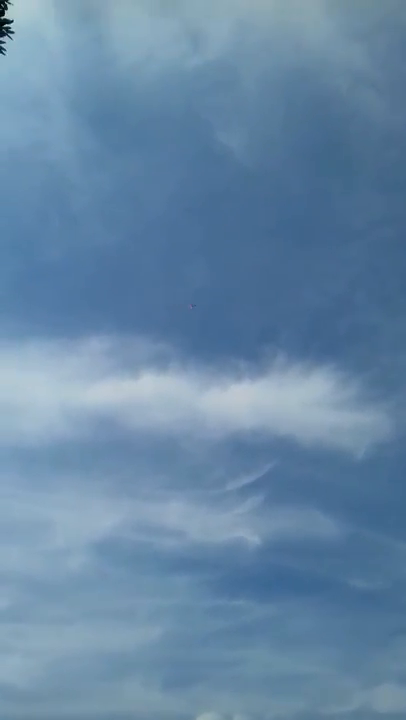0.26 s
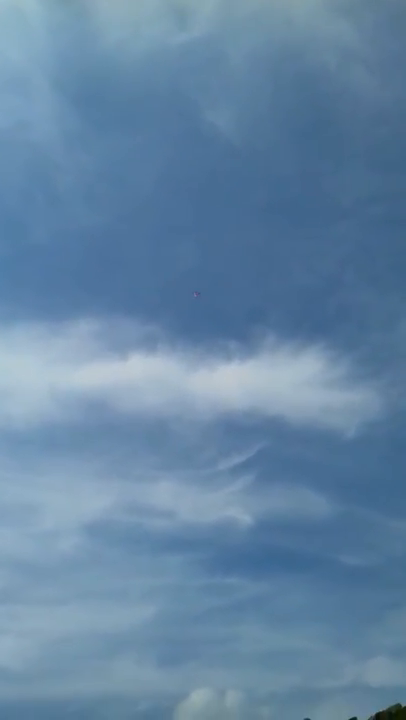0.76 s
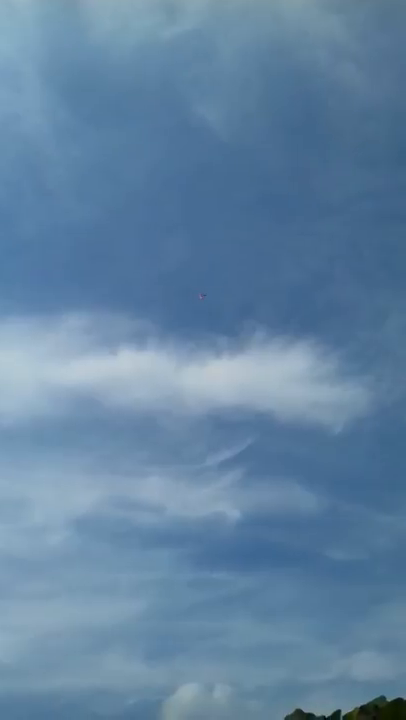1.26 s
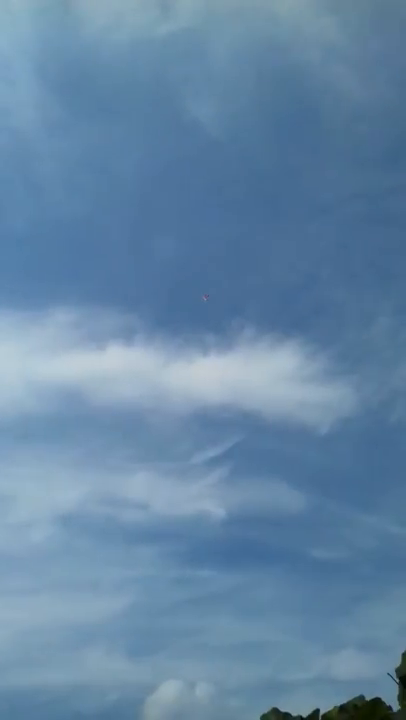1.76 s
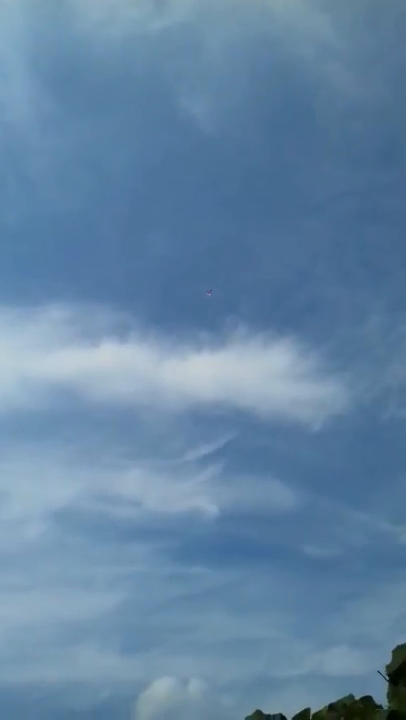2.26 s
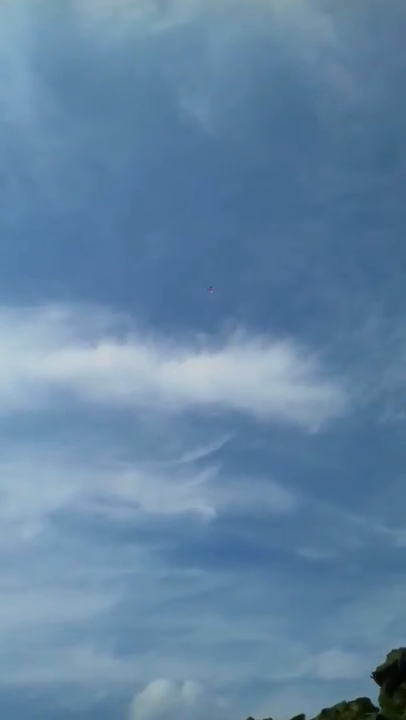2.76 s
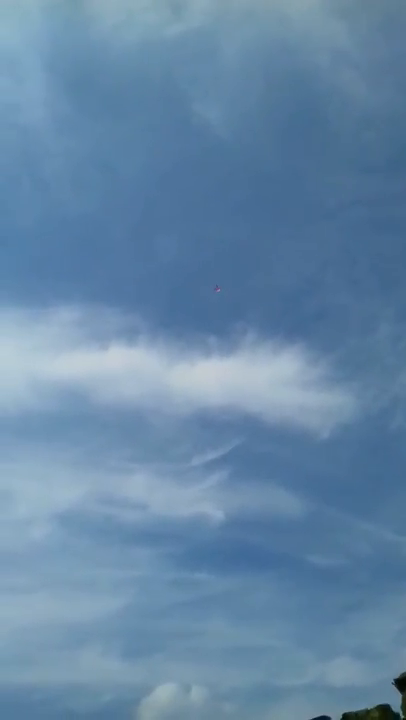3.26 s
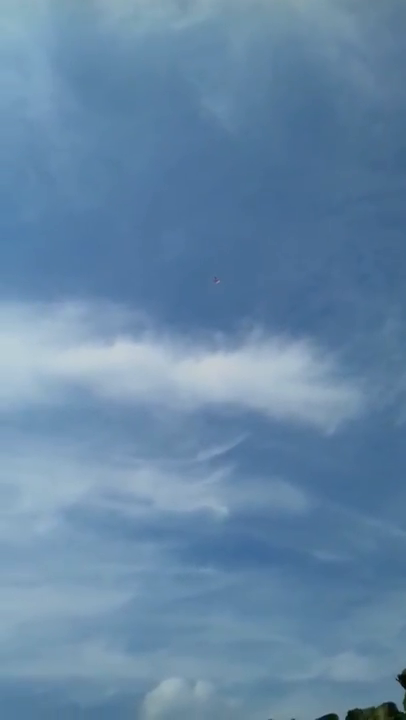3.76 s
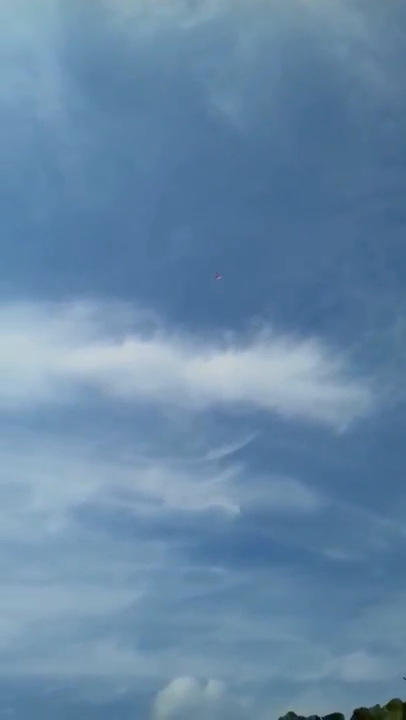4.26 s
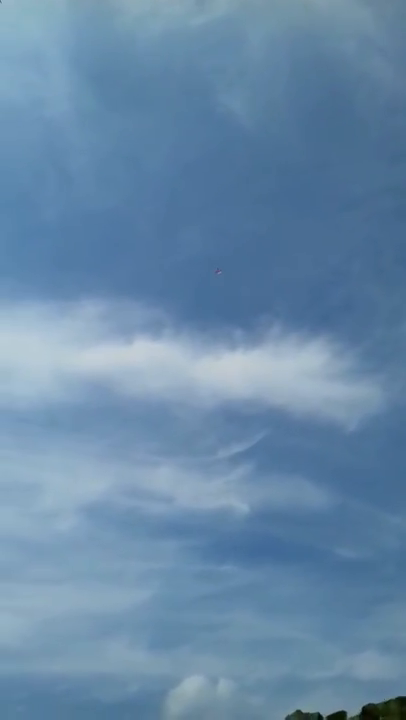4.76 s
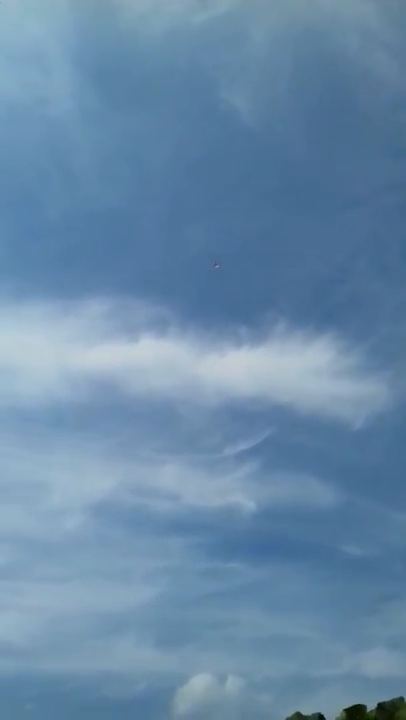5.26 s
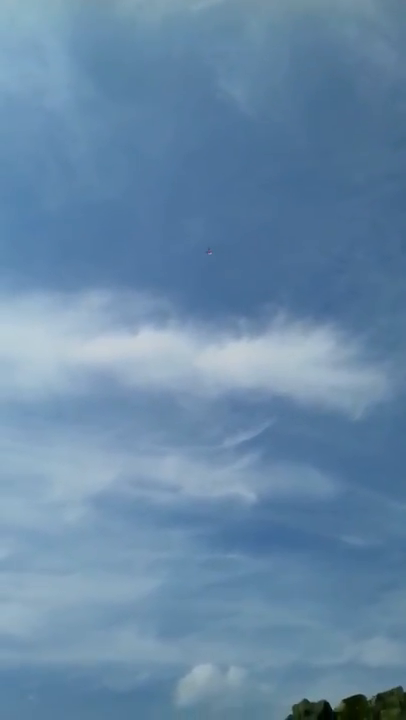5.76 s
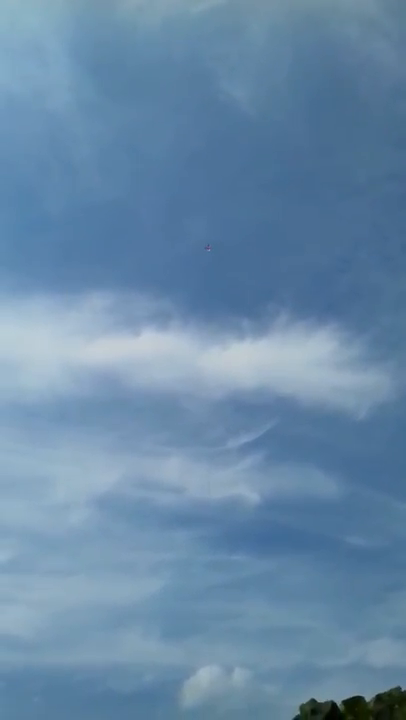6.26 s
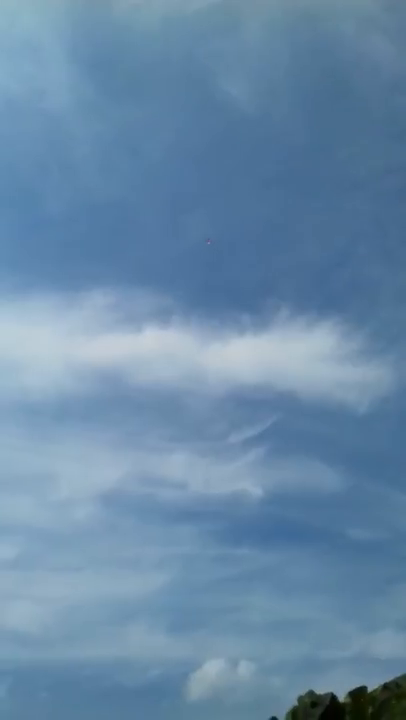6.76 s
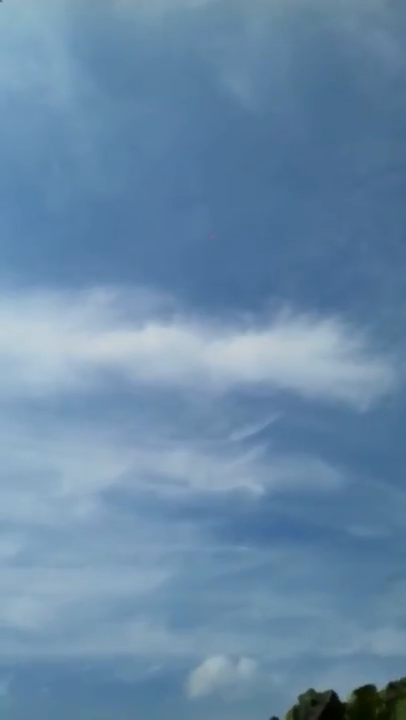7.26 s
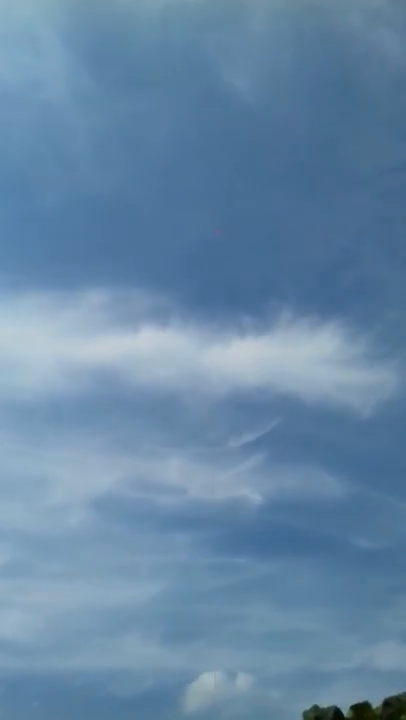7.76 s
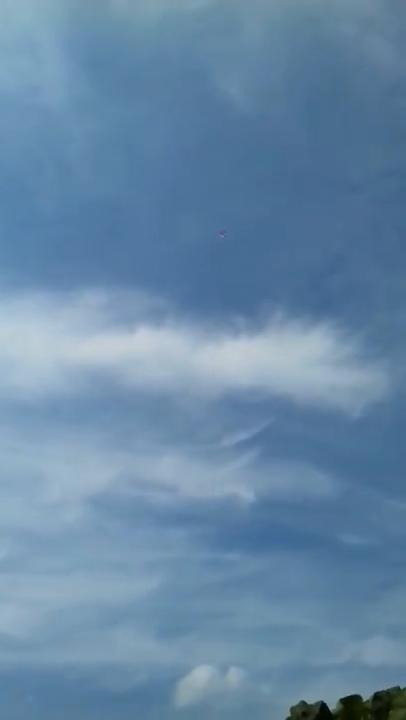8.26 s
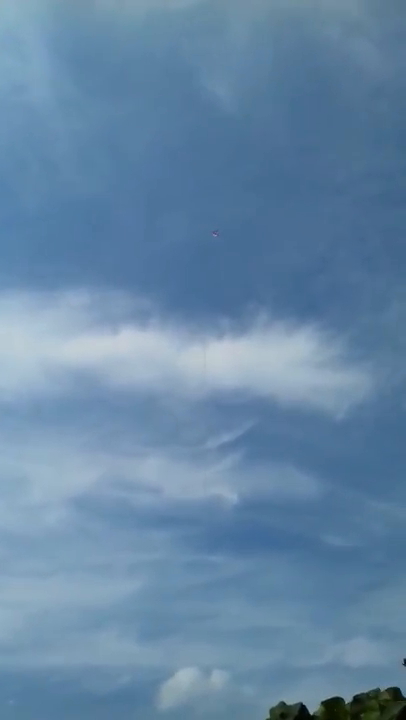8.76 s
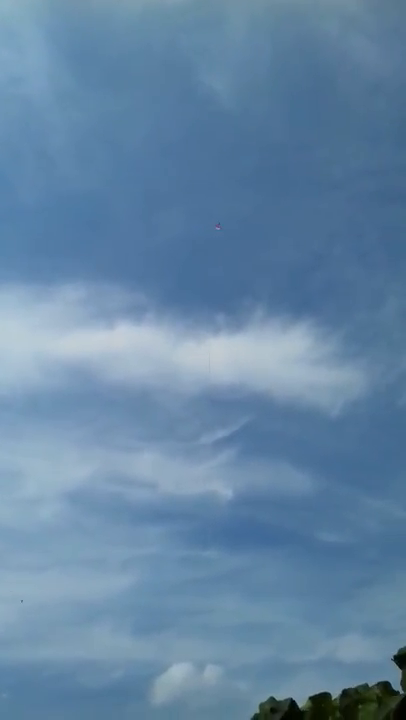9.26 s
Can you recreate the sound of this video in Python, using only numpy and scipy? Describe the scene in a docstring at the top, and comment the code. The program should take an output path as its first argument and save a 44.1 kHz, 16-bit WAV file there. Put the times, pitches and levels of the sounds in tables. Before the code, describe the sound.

A small kite high in the open sky hums with a reedy, nasal buzz, throbbing about nine times a second and jumping slightly in pitch. Midway it settles into a steadier trembling note, then flutters again. Close leaves rustle softly with dry snaps and twig ticks; small birds give brief clear chirps. A quiet outdoor wash, low rumble and microphone hiss lie beneath.

```python
"""Kite with a humming ribbon

A kite flies high over open ground; the wind spins the ribbon on its bow into a buzzing hum, built from
harmonics of the flap rate, that throbs and jumps in pitch. Close by, shaped noise makes leaves rustle and snap
and twigs tick; small birds in the trees chirp with gliding sines. Puffs of wind are short swings of pressure.
Far off lie a noise wash, a rumble, a low hum and a faint whine that climbs; foliage and amplifiers hiss."""
import sys
import numpy as np
from scipy import signal
from scipy.fft import rfft, irfft, next_fast_len
from scipy.io import wavfile
from scipy.ndimage import uniform_filter1d

SR = 44100
rng = np.random.default_rng(int(sys.argv[2]) if len(sys.argv) > 2 else 0)


def dump_mix(stems):
    """Bounce the given channels to the path in sys.argv[1] as a 16-bit WAV at rate SR."""
    frames = np.atleast_2d(stems).T  # one column per channel
    limited = np.clip(frames, -1, 1)  # hard clip at full scale
    pcm = np.round(limited * 32767).astype(np.int16)
    wavfile.write(sys.argv[1], SR, pcm)


def nominal_scale(level):
    """Amplitude ratio for a level in decibels (scalar or array-like)."""
    x = np.asarray(level, float) / 20
    return 10 ** x


N = 419082  # length in samples


def rms_one(x):
    """Scale a sound to an rms of 1."""
    return x / np.sqrt(np.mean(x ** 2) + 1e-20)


def in_time(rows):
    """Draw straight lines between the rows of a table that starts with seconds: one curve per other column."""
    s, *columns = np.transpose(rows)
    return [np.interp(np.arange(N) / SR, s, c) for c in columns]


def coloured(x, spectrum):
    """Filter a sound so that each frequency gets the dB that a (Hz, dB) table gives it."""
    hz, db = np.transpose(spectrum)
    size = next_fast_len(N)
    log_hz = np.log(np.maximum(np.fft.rfftfreq(size, 1 / SR), 1))
    gain = nominal_scale(np.interp(log_hz, np.log(hz), db))
    return irfft(rfft(x, size) * gain, size)[..., :N]


def drift(rate_hz):
    """Random wandering of spread 1: noise through two equal low-pass steps, made at every 40th sample."""
    r = np.exp(-2 * np.pi * rate_hz * 40 / SR)
    noise = rng.standard_normal(N // 40 + 2002)
    slow = signal.lfilter([1], [1, -2 * r, r * r], noise)[2000:]  # skip the filter's start
    return np.interp(np.arange(N) / 40, np.arange(len(slow)), rms_one(slow))


def band(x, low_hz, high_hz):
    """Keep the frequencies between two limits, with a Butterworth band-pass."""
    return signal.sosfilt(signal.butter(2, [low_hz, high_hz], "band", fs=SR, output="sos"), x)


def tone(hz):
    """Sine of rms 1 that follows a pitch curve."""
    return np.sqrt(2) * np.sin(2 * np.pi * np.cumsum(hz) / SR)


def burst(db, t60_s, rise_s=0.0013):
    """Loudness shape of a short burst: a soft rise and an exponential fall of 60 dB in t60_s."""
    t = np.arange(4000) / SR
    return nominal_scale(db - 60 * t / t60_s) * (1 - np.exp(-t / rise_s)) ** 2 * 2


def ribbon():
    """Each flap is a pulse into the ribbon's two resonances: harmonics under two bells, a new rate each throb."""
    # Brightness in time. Each row: time in seconds, level of the upper resonance in dB at a middling flap rate.
    brightness = [(0, -12), (.6, -5), (.8, -14), (1.05, -1), (1.3, -10), (1.7, 0), (1.9, -13), (2.35, -13),
                  (2.6, -10), (2.9, -7), (3.35, -18), (3.75, -4), (4.2, -20), (4.42, -15), (4.52, -2),
                  (5.27, 3.5), (5.46, -24), (7.65, -17), (8.1, -14), (8.42, -1), (8.52, -13), (9.5, -14)]
    unsteady, shimmer_db = .0016, .35  # wander of rate (share) and level, both times the raggedness below
    dip_s, top_s, dip_db, top_db, flap_hz = throb_tops()

    # Faster flaps are brighter, and the main resonance climbs with brightness.
    upper_db = np.interp(top_s, *np.transpose(brightness)) + 1.2 * (flap_hz - 61.6)
    main_hz = 703 + 1.87 * upper_db

    # The level runs from dip to top to dip, with round turns.
    t = np.arange(N) / SR
    order = np.arange(2 * len(top_s))
    place = np.interp(t, np.ravel([dip_s, top_s], "F"), order)
    step = np.floor(place)
    eased = step + .5 - .5 * np.cos(np.pi * (place - step))
    level = np.interp(eased, order, nominal_scale(np.ravel([dip_db, top_db], "F")))

    # The flap rate jumps in the dip; the more it hops, the more ragged the flaps.
    which = np.searchsorted(dip_s, t, "right") - 1
    hop_hz = np.abs(np.gradient(flap_hz)) + np.abs(np.diff(flap_hz, prepend=flap_hz[0]))
    ragged = uniform_filter1d(np.clip(hop_hz, .3, 3.5)[which], size=6000)
    rate_hz = uniform_filter1d(flap_hz[which], size=600) * (1 + unsteady * ragged * drift(40.0))
    level = level * nominal_scale(shimmer_db * ragged * drift(45.0))

    main_hz = uniform_filter1d(main_hz[which], size=1200)
    upper = nominal_scale(uniform_filter1d(upper_db[which], size=1200))
    turn = 2 * np.pi * np.cumsum(rate_hz) / SR
    out, power = 0, 0
    for k in range(7, 18):
        main_bell = np.exp(-.5 * ((k * rate_hz - main_hz) / 52) ** 2)  # 52 Hz wide
        upper_bell = upper * np.exp(-.5 * ((k * rate_hz - 838) / 34) ** 2)  # at 838 Hz, 34 Hz wide
        strength = main_bell + upper_bell + nominal_scale(-27)  # a weak floor under both bells
        strength = strength * nominal_scale(1.0 * drift(10.0))  # gusty air scatters each harmonic its own way
        out = out + strength * np.cos(k * turn + .35 * k ** 2)
        power = power + strength ** 2 / 2
    return level * out / np.sqrt(power)


def throb_tops():
    """Times and levels of each throb's top and the dip before it, with held notes laid in among the throbs."""
    # Throbs of the ribbon, each a short note. Each row: time of the top in seconds, level in dB, flap rate in Hz.
    throbs = [(.115, -54.3, 57.9), (.224, -54.8, 62.4), (.354, -56.9, 64.4), (.47, -57.5, 64.5),
              (.553, -57.6, 59.2), (.706, -57.5, 57.2), (.806, -54, 63.5), (.911, -54.1, 58.7),
              (1.039, -54.5, 59.3), (1.136, -56, 64.1), (1.257, -55.5, 58.7), (1.351, -54.1, 57.8),
              (1.469, -51.7, 64.6), (1.568, -54.3, 61.6), (1.669, -51, 64.7), (1.78, -54.6, 57.7),
              (1.86, -57.2, 58), (2.126, -61.4, 57.8), (2.353, -56.4, 58.1), (2.48, -54.3, 64.5),
              (2.585, -55, 61), (2.686, -54.8, 64.4), (2.801, -55.7, 62.2), (2.895, -55.3, 64.5),
              (3.01, -57.4, 63.2), (3.133, -59.9, 58.6), (3.223, -58.3, 61.5), (3.56, -54.6, 64.3),
              (3.666, -54.5, 68.8), (3.772, -54.3, 59.7), (3.897, -57, 62.9), (4.035, -55.5, 63.9),
              (4.143, -53.9, 57.6), (4.298, -54.7, 63.4), (4.402, -56.4, 57.6), (4.531, -56.2, 63.7),
              (4.631, -57.9, 58.6), (4.733, -57, 64.4), (4.834, -58.8, 63.6), (4.961, -58.9, 57),
              (5.041, -57.2, 63.4), (5.163, -55.1, 57.3), (5.265, -57.6, 58.7), (5.484, -58.7, 57.4),
              (7.221, -55.3, 58), (7.332, -59, 63.2), (7.477, -58, 58), (7.604, -55.4, 58.3),
              (7.696, -57.4, 62.8), (7.806, -57, 64.4), (7.901, -58.4, 56.9), (8.003, -57.1, 70.6),
              (8.113, -58.1, 62.9), (8.2, -59.1, 70.9), (8.323, -58.1, 64.7), (8.426, -57.7, 57.6),
              (8.509, -61.4, 58.5), (8.715, -62.1, 58.9), (8.82, -56.4, 62.9), (8.975, -55.5, 58.1),
              (9.078, -57.7, 57.5), (9.222, -58.5, 58.6), (9.328, -54.7, 61.1), (9.48, -53, 64.1)]
    # In even wind the ribbon holds a note that only trembles. Each row: first top in seconds, last top in
    # seconds, level in dB at the start, level in dB at the end, flap rate in Hz.
    held_notes = [(3.314, 3.44, -54.5, -54.5, 57.9), (5.62, 5.83, -60, -56.5, 57.5),
                  (5.924, 7.09, -54, -55, 57.55)]
    tremble_s, tremble_db = .105, 2.0  # rough spacing of tops in a held note, dip between them
    rows = [(*row, False) for row in throbs]
    for first_s, last_s, start_db, end_db, hz in held_notes:
        along = np.linspace(0, 1, 1 + round((last_s - first_s) / tremble_s))
        for a in along:
            rows.append((first_s + a * (last_s - first_s), start_db + a * (end_db - start_db), hz, a > 0))
    top_s, top_db, flap_hz, held = np.transpose(sorted(rows))

    # The longer the gap, the deeper the dip; chance makes some gaps deep and joins others.
    gap_s = np.diff(top_s, prepend=0)
    sink_db = 176 * (gap_s - 0.025) + 1.5 * rng.standard_normal(len(gap_s))
    sink_db = np.where(held, tremble_db, np.clip(sink_db, 2, 26))
    dip_s = np.r_[0, top_s[1:] - .35 * gap_s[1:]]  # a throb rises faster than it falls
    between_db = (top_db + np.r_[top_db[0], top_db[:-1]]) / 2
    return dip_s, top_s, between_db - sink_db, top_db, flap_hz


def birds():
    """Near sines that arch or fall in pitch and fade, with a fast flutter, smeared by echoes off the trees."""
    # Chirps with an arch of pitch. Each row: start in seconds, length in seconds, top pitch in Hz,
    # fall from the top to the end in Hz, level in dB before the fade.
    chirps = [(.18, .055, 4500, 300, -51), (.728, .05, 3600, 30, -47), (3.331, 0.07, 3700, 130, -42.5),
              (3.61, 0.027, 4050, 30, -43), (4.95, 0.061, 3694, 180, -42), (5.057, 0.11, 4310, 460, -46.5),
              (5.992, 0.068, 3750, 221, -42), (7.146, 0.044, 3630, 30, -51.5),
              (7.189, 0.068, 3630, 30, -59), (7.208, .06, 7540, 1000, -68), (7.402, 0.064, 3734, 220, -42),
              (7.902, 0.11, 3770, 403, -46), (7.937, .06, 4890, 100, -53), (8.254, .03, 4900, 130, -49),
              (8.718, .105, 4255, 400, -45.5)]
    # Falling whistles. Each row: start in seconds, length in seconds, start pitch in Hz, end pitch in Hz,
    # level in dB before the fade.
    whistles = [(.162, .025, 3800, 2900, -50.5), (.22, 0.023, 4100, 3750, -48),
                (.241, .017, 3830, 3230, -45.5), (.252, 0.027, 2640, 2520, -54),
                (7.33, 0.1, 3300, 2770, -56), (7.901, 0.14, 3000, 2600, -59),
                (8.241, 0.066, 3730, 3340, -40.5)]
    top_share = .34  # where in a chirp the highest pitch lies
    rise_per_fall = 1.126  # the climb to the top, as a share of the fall
    out = np.zeros(N)
    waver_hz = 20.0 * drift(61.0)

    def add(s, db, along, hz):
        """Lay in one note, with soft ends and a fade of 7 dB from start to end."""
        here = slice(int(s * SR), int(s * SR) + len(along))
        shape = nominal_scale(db - 7.0 * along) * signal.windows.tukey(len(along), .42)
        out[here] += shape * tone(hz + waver_hz[here])

    for s, length_s, top_hz, fall_hz, db in chirps:
        along = np.linspace(0, 1, int(length_s * SR))
        bend = np.where(along < top_share, rise_per_fall / top_share ** 2, 1 / (1 - top_share) ** 2)
        add(s, db, along, top_hz - fall_hz * bend * (along - top_share) ** 2)
    for s, length_s, start_hz, end_hz, db in whistles:
        along = np.linspace(0, 1, int(length_s * SR))
        add(s, db, along, start_hz + (end_hz - start_hz) * along)

    husky = out * nominal_scale(1.8 * drift(130.0))  # fast chance in the level roughens the notes
    lags_s = rng.uniform(.004, 0.06, 8)
    echoes = sum(np.roll(husky, int(lag * SR)) * nominal_scale(-250 * lag) for lag in lags_s)  # later is weaker
    return husky + nominal_scale(-13.0) * echoes


def leaves():
    """Noise that swells in patches, with random small ticks and the louder snaps: all share one colour."""
    # Rustle in time. Each row: time in seconds, level in dB between 4350 and 5600 Hz.
    rustle = [(0.0, -55), (0.55, -54), (1.72, -53.5), (1.93, -55.5), (3.12, -55), (3.47, -53.5),
              (3.83, -53), (4.76, -55.5), (5.05, -53.5), (5.21, -56), (5.98, -55), (6.14, -54.5),
              (6.85, -55), (7.2, -57), (8.09, -53), (8.44, -56), (8.81, -56.5), (8.99, -53.5), (9.18, -56),
              (9.5, -56.5)]
    # Colour of the leaves. Each row: frequency in Hz, strength in dB.
    leaf_colour = [(1200, -26), (2200, -17), (3000, -11), (3700, -4.5), (4440, 1), (4900, -3.5),
                   (5500, -13), (6660, -23.5), (9000, -32.5), (15800, -65)]
    # Snaps of dry leaves. Each row: start in seconds, level in dB before the burst's shape.
    snaps = [(1.162, -51), (1.483, -52), (1.742, -45), (1.8676, -38.5), (1.869, -47), (1.995, -53),
             (3.518, -49), (3.585, -54), (4.072, -45), (4.077, -46), (4.47, -49), (4.488, -45),
             (5.447, -47), (6.591, -48), (6.63, -49)]
    ticks_per_s, tick_db = 20.0, 3.0  # average rate, average boost (random, at most 4 times as much)
    decay = nominal_scale(-60 / (0.004 * SR))  # a tick dies away by 60 dB in 4 ms
    ticks = (rng.random(N) < ticks_per_s / SR) * nominal_scale(tick_db * np.minimum(rng.exponential(1, N), 4))
    patches = nominal_scale(in_time(rustle)[0] + 1.0 * drift(14.0))
    swell = patches * (1 + signal.lfilter([1], [1, -decay], ticks))
    for s, db in snaps:
        swell[int(s * SR):int(s * SR) + 4000] += burst(db, t60_s=0.023)
    noise = rng.standard_normal(N)
    reference = np.std(band(coloured(noise, leaf_colour), 4350, 5600))
    return coloured(swell * noise, leaf_colour) / reference


def twigs():
    """Duller ticks of twigs: each a short burst of noise, a quarter of an octave wide."""
    # Each row: start in seconds, level in dB before the burst's shape, middle frequency in Hz.
    twig_ticks = [(1.53, -54, 2600), (1.67, -48, 2900), (2.86, -53, 2900), (4.076, -45, 2800),
                  (4.226, -45, 1590), (5.449, -51, 1800), (6.59, -44, 2580), (7.679, -48, 2530),
                  (8.347, -43, 2970), (8.349, -44, 3600)]
    out = np.zeros(N)
    for s, db, hz in twig_ticks:
        noise = rms_one(band(rng.standard_normal(4000), hz / 1.1, hz * 1.1))
        out[int(s * SR):int(s * SR) + 4000] += burst(db, t60_s=0.039, rise_s=0.0025) * noise
    return out


def puffs():
    """Puffs of wind on the microphone: each a soft swing of pressure, two and a half cycles long."""
    # Each row: start in seconds, level in dB before the swing's shape, swing rate in Hz.
    wind_puffs = [(1.45, -58, 70), (4.51, -46.5, 138), (9.07, -56, 95), (9.245, -53.5, 115),
                  (9.29, -59, 95), (9.316, -60, 85), (9.34, -59, 100)]
    out = np.zeros(N)
    for s, db, hz in wind_puffs:
        cycles = np.arange(int(2.5 * SR / hz)) * hz / SR
        shape = np.sin(np.pi * cycles / 2.5) ** 2 * np.exp(.9 * (1 - cycles))  # leans to the early swings
        out[int(s * SR):int(s * SR) + len(cycles)] += nominal_scale(db) * np.sin(2 * np.pi * cycles) * shape
    return out


def distance():
    """Noise wash of wind and land, a noise rumble that comes and goes, a low steady hum and a thin noisy whine."""
    # Open-air wash in time. Each row: time in seconds, level in dB between 950 and 2500 Hz.
    wash_levels = [(0, -60), (1.6, -58.5), (2.1, -60), (3.8, -59.5), (4.6, -59.5), (5.5, -61), (8.3, -60),
                   (8.45, -60.5), (9.5, -60.5)]
    # Colour of the wash. Each row: frequency in Hz, strength in dB.
    wash_colour = [(25, -39), (42, -22), (55, -3), (130, -6), (330, -5), (480, 0), (700, 4.5), (950, 0),
                   (2200, -1.5), (3200, -6), (5000, -27)]
    # Low rumble in time. Each row: time in seconds, level in dB.
    rumble_levels = [(0, -81), (1.6, -68), (2.1, -74), (2.67, -69), (2.96, -78), (3.78, -68), (3.9, -92),
                     (4.8, -86), (5.48, -72), (6.75, -79), (7.3, -76), (8.4, -82), (9.5, -78)]
    # Tones of the far hum. Each row: average pitch in Hz, average level in dB.
    hum_tones = [(57.3, -77), (172, -82)]
    # Whine in time. Each row: time in seconds, average pitch in Hz, average level in dB.
    whine_path = [(0, 1620, -70), (.35, 1697, -64), (.65, 1740, -70.5), (1.15, 1860, -68), (1.5, 1905, -78),
                  (2.4, 1920, -73), (3.1, 1900, -69), (3.4, 1880, -76), (3.7, 1870, -95)]
    wash = coloured(rng.standard_normal(N), wash_colour)
    wash = wash / np.std(band(wash, 950, 2500))
    wash = wash * nominal_scale(in_time(wash_levels)[0] + .7 * drift(5.0))
    rumble = nominal_scale(in_time(rumble_levels)[0]) * rms_one(band(rng.standard_normal(N), 159, 271))
    hum = 0
    for hz, db in hum_tones:
        hum = hum + nominal_scale(db + 1.0 * drift(0.57)) * tone(hz * (1 + 0.00398 * drift(0.8)))
    whine_hz, whine_db = in_time(whine_path)
    # fast chance in pitch and level makes the whine noisy
    whine = nominal_scale(whine_db + 2.5 * drift(40.0)) * tone(whine_hz * (1 + .018 * drift(40.0)))
    return wash + rumble + hum + whine


def treetops():
    """Thin high hiss of foliage all around: noise that swells at random, left and right only a little alike."""
    alike = .1  # 0 = unrelated sides, 1 = the same on both
    mid, side = band(rng.standard_normal((2, N)), 6500, 15000)
    wide = mid + np.sqrt((1 - alike) / (1 + alike)) * side * [[1], [-1]]
    return nominal_scale(-76.5 + 2.5 * drift(11.0)) * rms_one(wide)


def scene():
    """Two ports close together hear all but the highest hiss alike."""
    return ribbon() + birds() + leaves() + twigs() + puffs() + distance() + treetops()


def low_pass(x):
    """Removes everything above the highest recorded frequency."""
    return signal.sosfilt(signal.butter(12, 15940, fs=SR, output="sos"), x)


def record(dry):
    """Two amplifiers add hiss, unrelated left and right, and both channels sit at the same small offset."""
    # Colour of the hiss. Each row: frequency in Hz, strength in dB.
    hiss_colour = [(25, -25), (107, -7), (955, 3.5), (3400, -2), (5400, -6), (14600, -11.5), (15800, -13)]
    hiss = nominal_scale(-66) * rms_one(coloured(rng.standard_normal((2, N)), hiss_colour))
    offset = -.0006
    return low_pass(dry + hiss + offset)


dry = scene()
out = record(dry)
dump_mix(out)
```